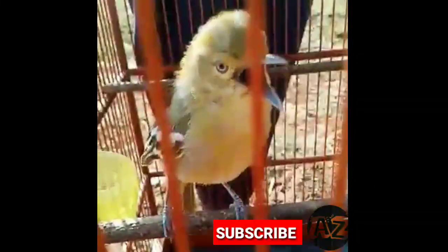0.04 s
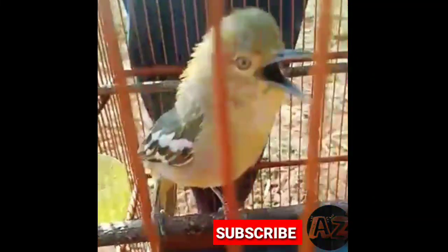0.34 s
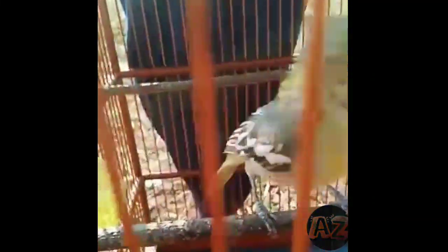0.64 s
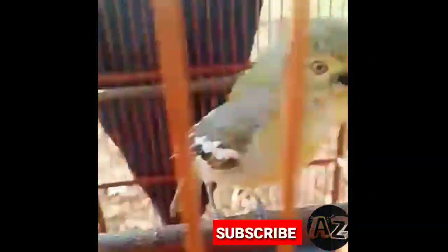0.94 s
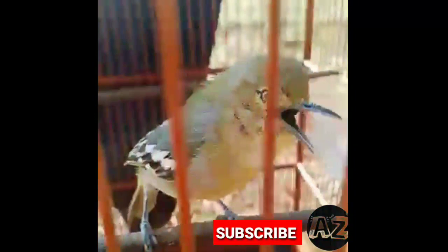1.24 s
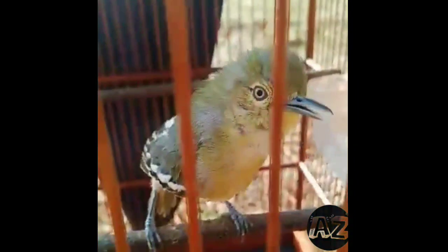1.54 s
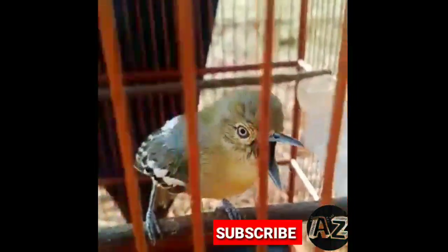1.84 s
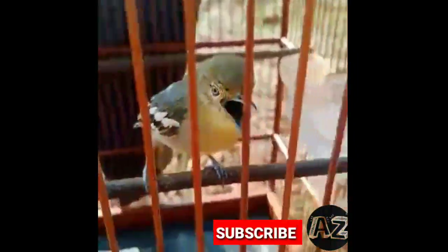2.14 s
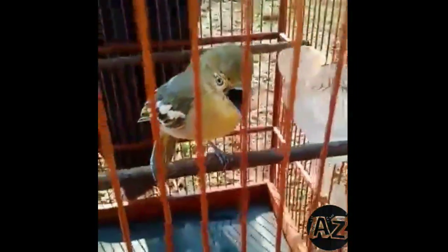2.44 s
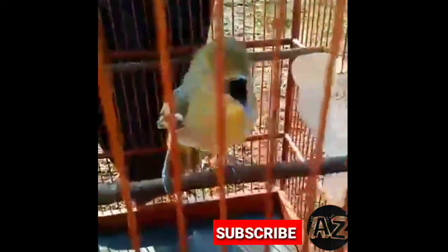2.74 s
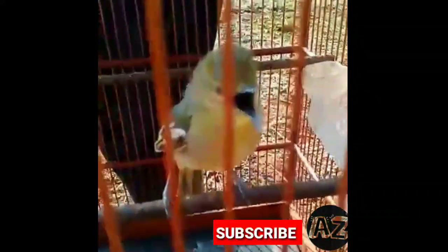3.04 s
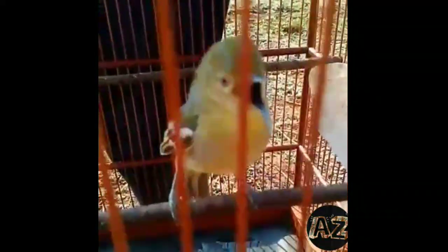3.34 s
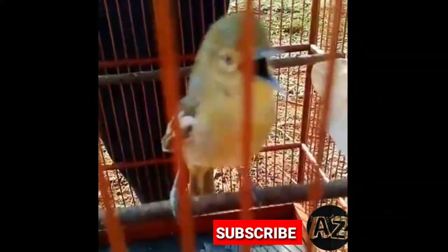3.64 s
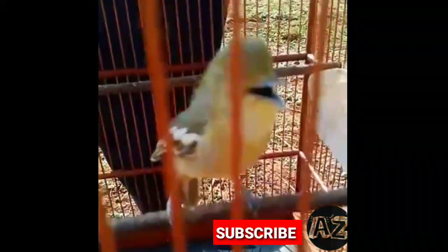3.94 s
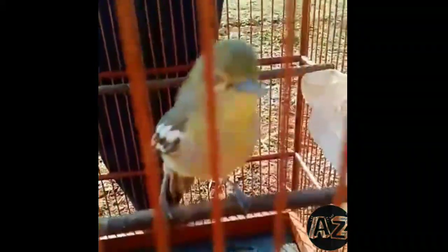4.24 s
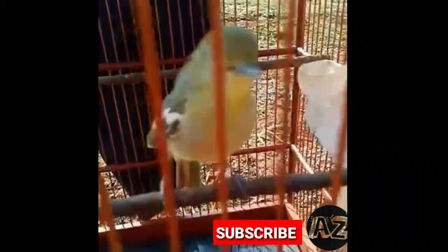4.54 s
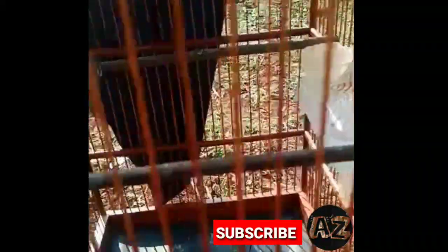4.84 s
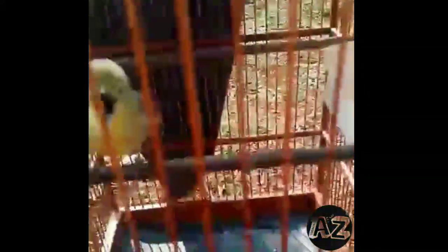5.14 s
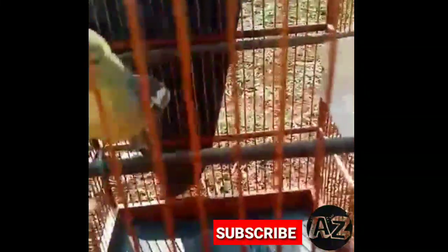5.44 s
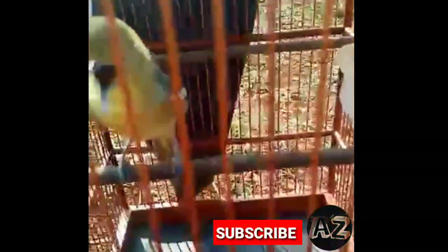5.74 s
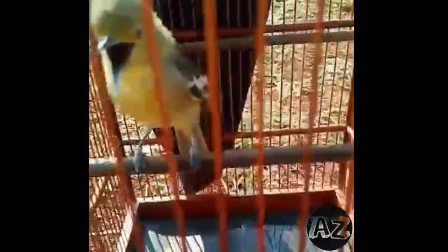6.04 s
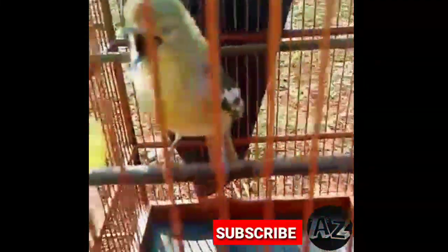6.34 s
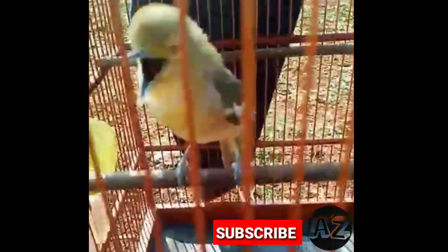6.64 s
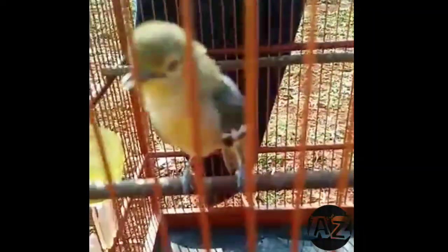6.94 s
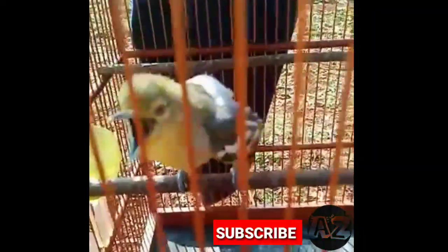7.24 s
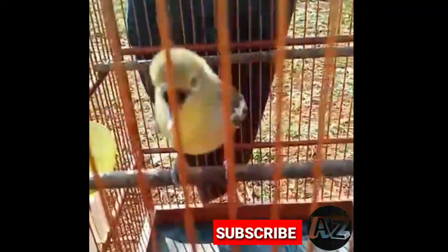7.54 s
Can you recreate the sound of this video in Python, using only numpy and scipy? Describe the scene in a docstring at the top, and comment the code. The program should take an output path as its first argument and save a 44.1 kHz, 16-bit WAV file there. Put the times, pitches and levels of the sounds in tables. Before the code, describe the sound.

A small bird scolds from its cage, a hand's width from the microphone, in three fast, rasping rattles. The first and the long third each finish with a clear downward whistle, while the middle one is short. Two quick wing flutters and a few claw clicks on the perch fill the gaps. Behind it are faint chirps from other birds, a quiet outdoor hush, low puffs of wind and a few soft hand thumps.

```python
"""In a quiet yard a caged common iora, a hand's width from a stereo phone, scolds in a long rattle: its
syrinx slaps shut and rings windpipe and throat, and the loudest syllables overload the phone. Air buffets
the ports and a hand bumps the case. As other birds chirp further off, the rattle ends in a falling whistle.
Feet click on the perch, wings flutter across the cage, and a shorter rattle follows. After a second
flutter come the longest rattle, another falling whistle and a last click."""
import sys
import numpy as np
from scipy import signal
from scipy.fft import rfft, irfft, next_fast_len
from scipy.io import wavfile
from scipy.ndimage import uniform_filter1d, minimum_filter1d, map_coordinates

SR = 44100
rng = np.random.default_rng(int(sys.argv[2]) if len(sys.argv) > 2 else 0)


def log_audio(samples):
    """Write samples as a 16-bit WAV file to the path given in sys.argv[1]."""
    # one column per channel
    frames = np.atleast_2d(samples).T
    # limit to full scale, then quantise
    limited = np.clip(frames, -1, 1)
    pcm = np.round(limited * 32767).astype(np.int16)
    wavfile.write(sys.argv[1], SR, pcm)


N = 343098
TIME = np.arange(N) / SR
# push of air through a syllable: (time from its centre [s], level [dB], glide of the resonances [ratio])
PUSH = [(-.024, -45.5, 1), (-.019, -17, 1.03), (-.013, -11.5, 1.07), (-.004, -1.5, 1.02), (.003, -1, 1),
        (.009, -3.5, 1), (.014, -17.5, .97), (.02, -31.5, .94)]


def undb(db):
    """Decibels to amplitude ratio."""
    return 10 ** (np.asarray(db) / 20)


def unit(x):
    """Normalisation to rms 1."""
    return x / np.sqrt(np.mean(x ** 2) + 1e-18)


def curve(rows, t):
    """Linear interpolation of a table's columns at times t."""
    times, *columns = np.transpose(rows)
    return [np.interp(t, times, column) for column in columns]


def colour(x, points):
    """Spectral shaping by points of (frequency [Hz], gain [dB])."""
    hz, db = np.transpose(points)
    size = next_fast_len(x.shape[-1] + 512)
    bins_hz = np.maximum(np.fft.rfftfreq(size, 1 / SR), 1)
    gain = undb(np.interp(np.log(bins_hz), np.log(hz), db))
    return irfft(rfft(x, size) * gain, size)[..., :x.shape[-1]]


def resonate(x, hz, width_hz):
    """Resonance: two like band-passes in cascade, each width_hz wide, gain 1 at the centre."""
    b, a = signal.iirpeak(hz, hz / width_hz, fs=SR)
    return signal.lfilter(b, a, signal.lfilter(b, a, x))


def wander(t, rate):
    """Random modulation: rate values a second, joined by lines; spread near 1."""
    knots = np.arange(t[0], t[-1] + 2 / rate, 1 / rate)
    return np.interp(t, knots, rng.standard_normal(len(knots)))


def pan(x, db):
    """Level difference between the ports, left minus right, at constant power."""
    gains = undb([[db / 2], [-db / 2]])
    return x * unit(gains)


def add(out, s, x):
    """Superposition of x on out from time s."""
    i = int(round(s * SR))
    a, b = max(i, 0), min(i + x.shape[-1], N)
    out[..., a:b] += x[..., a - i:b - i]


def fade(t, t60):
    """Exponential decay, 60 dB in t60 seconds."""
    return np.exp(-np.log(1000) * t / t60)


def ambience(spectrum, db, flicker_db):
    """Partial coherence: the ports share half the power of a coloured noise."""
    noise = rng.standard_normal(N) + rng.standard_normal((2, N))
    return unit(colour(noise, spectrum)) * undb(db + flicker_db * wander(TIME, 18))


def yard():
    """Background noise: a broadband hush that the phone turns down after the loud calls."""
    # (time [s], level [dB])
    levels = [(0, -53.5), (2.1, -59.5), (4.9, -59.5), (6.9, -58.5), (7.3, -68.5), (7.78, -63.5)]
    # (frequency [Hz], gain [dB])
    spectrum = [(25, -21), (60, -3), (150, -7.5), (300, -4), (600, -7), (1100, -9), (1900, -8), (3000, -14),
                (4200, -17.5), (6000, -26), (14000, -33)]
    return ambience(spectrum, curve(levels, TIME)[0], flicker_db=-0.14)


def saturate(x, amount):
    """Saturation, as in a membrane, evens out the swings of an oscillation."""
    swing = uniform_filter1d(np.abs(signal.hilbert(x)), size=48)
    return x / (swing + 0.032 * swing.mean()) ** amount


def syllable(modes, pulse_hz=470, jitter=.2, scatter_db=1.0, rasp=0.71):
    """Source and filter: in one push of air the syrinx slaps shut unevenly, ringing windpipe and throat."""
    # radiation from the beak: (frequency [Hz], gain [dB])
    beak = [(500, -21.5), (1000, -1.5), (1450, 9.5), (2000, 5), (2500, 4), (3400, 1.5), (4400, -3.5),
            (5500, -9.5), (6200, -19.5), (7200, -24), (15000, -21.5)]
    t = np.arange(PUSH[0][0], PUSH[-1][0], 1 / SR)
    push_db, glide = curve(PUSH, t)
    timing, force = rng.standard_normal((64, 2)).T
    slap_samples = (np.cumsum(np.exp(jitter * timing)) * SR / pulse_hz).astype(int)
    slaps = np.bincount(slap_samples, undb(scatter_db * force), len(t))[:len(t)]
    source = unit(slaps) + rasp * rng.standard_normal(len(t))
    voice = sum(undb(db) * resonate(source, hz, width_hz) for hz, width_hz, db in modes)
    voice = saturate(voice, amount=.4) * undb(push_db)
    voice = map_coordinates(voice, [np.cumsum(glide / glide.mean())], order=5)  # bends all frequencies
    return unit(colour(voice, beak))


def rattle(start_s, count, period_s, slow_start_s, slow_end_s, settle,
           db, sag_db, first_db, warm_up, last_db, pan_db,
           throat_hz, rise_hz, gape, first_gape, windpipe_hz, windpipe_db, first_windpipe_db,
           windpipe_width_hz=750, throat_scatter=.024, scatter_db=1, last_push_syllables=1.1):
    """Cavity tuning: as the beak closes, the throat rings lower and tighter from syllable to syllable."""
    # modes of throat and open beak: (frequency / throat resonance [ratio], width at gape 1 [Hz], gain [dB])
    throat = [(.8, 751, -13), (0.991, 841, 13.5), (1.148, 834, -20), (1.379, 1065, -24), (1.651, 1095, -22)]
    out, s = np.zeros(N), start_s
    for k, (loud, tense) in enumerate(rng.standard_normal((count, 2))):
        opening = np.exp(-k / settle)
        tired = (k / (count - 1)) ** 3
        hz = (throat_hz + rise_hz * opening) * (1 + throat_scatter * tense)
        damping = gape * (first_gape / gape) ** opening
        modes = [(ratio * hz, width_hz * damping, gain_db) for ratio, width_hz, gain_db in throat]
        pipe_db = windpipe_db + (first_windpipe_db - windpipe_db) * opening
        modes.append((windpipe_hz, windpipe_width_hz, pipe_db))
        onset_db = first_db * np.exp(-(k / warm_up) ** 2)
        ending_db = last_db * np.exp((k + 1 - count) / last_push_syllables)
        level_db = db - sag_db * k / count + onset_db + ending_db + scatter_db * loud
        add(out, s + PUSH[0][0], syllable(modes) * undb(level_db))
        s += period_s + slow_start_s * opening + slow_end_s * tired  # quickens, then drags as the bird tires
    return pan(out, pan_db)


def scolding():
    """Acoustic shadow: the three rattles reach the left port shaded by the phone's body."""
    # rhythm, effort and posture of each rattle, keyed as the arguments of rattle():
    # (*_s [s], *_hz [Hz], db and *_db [dB], count, settle and warm_up [syllables], gapes [width ratio])
    rattles = [ dict(start_s=.021, count=25, period_s=.05572, slow_start_s=.0087, slow_end_s=.0047, settle=3, db=-10.5, sag_db=3, first_db=-2.4, warm_up=2.6, last_db=-0.95, pan_db=0.5, throat_hz=3290, rise_hz=634, gape=0.72, first_gape=1.5, windpipe_hz=1390, windpipe_db=-13.5, first_windpipe_db=-8),
               dict(start_s=3.3955, count=11, period_s=.05556, slow_start_s=.0113, slow_end_s=.0083, settle=2, db=-10.5, sag_db=0.3, first_db=-18, warm_up=1.36, last_db=-2.4, pan_db=0, throat_hz=3324, rise_hz=780, gape=0.81, first_gape=3.9, windpipe_hz=1325, windpipe_db=-12.5, first_windpipe_db=4),
               dict(start_s=5.2745, count=30, period_s=.05311, slow_start_s=.0034, slow_end_s=.0038, settle=2, db=-14.5, sag_db=1.1, first_db=-7.5, warm_up=.4, last_db=2.5, pan_db=-4, throat_hz=3576, rise_hz=910, gape=1.023, first_gape=1.6, windpipe_hz=1563, windpipe_db=-13, first_windpipe_db=-17)]
    # (frequency [Hz], gain [dB])
    shade = [(900, -1), (1200, -5), (1800, 0.5), (2100, 0), (2350, -11), (2800, -0.5), (3100, -0.5),
             (3500, -1.5), (4300, -0.5), (6000, 3)]
    left, right = sum(rattle(**row) for row in rattles)
    return np.array([colour(left, shade), right])


def left_late(pair):
    """Path difference: the bird sits to the right, so its voice reaches the left port later."""
    # the bird changes perch: (time [s], lag of the left port [ms])
    perches = [(4.68, .235), (4.8, .31)]
    lag_samples = curve(perches, TIME)[0] * SR / 1000
    return np.array([map_coordinates(pair[0], [np.arange(N) - lag_samples], order=3), pair[1]])


def buffeting(draught_db=-59):
    """Turbulent pressure: gusts swell and die over a steady draught and rumble on the ports."""
    # (peak time [s], half length [s], level [dB])
    gusts = [(.12, 0.24, -37), (0.984, 0.25, -55), (2.49, 0.036, -52), (2.782, 0.05, -65),
             (3.32, 0.3, -45.5), (3.764, 0.11, -41), (4.015, 0.061, -44), (4.271, 0.046, -44),
             (4.747, .1, -46)]
    # (frequency [Hz], gain [dB])
    spectrum = [(25, -40), (55, -4), (90, 3.5), (150, -4), (250, -14), (450, -35.5), (1000, -52.5),
                (8000, -75)]
    swells = sum(undb(db) * np.exp(-((TIME - s) / half_s) ** 2) for s, half_s, db in gusts)
    return ambience(spectrum, 20 * np.log10(undb(draught_db) + swells), flicker_db=4.5)


def hand_bumps(t60=0.039, rise_s=0.001):
    """Structure-borne sound: the hand bumps the phone with a damped low thump, mostly at the right port."""
    # (time [s], frequency [Hz], relative level [dB])
    bumps = [(.05, 135.2, -21.5), (3.208, 113, -26), (3.306, 135, -24), (3.767, 123, -18.5),
             (4.246, 107, -32)]
    out, t = np.zeros((2, N)), np.arange(SR // 8) / SR
    envelope = fade(t, t60) * (1 - np.exp(-t / rise_s))
    for s, hz, db in bumps:
        add(out, s, pan(2 * undb(db) * np.sin(2 * np.pi * hz * t) * envelope, db=-26.0))
    return out


def far_birds(rough_depth=0.19):
    """Random modulation of pitch and amplitude roughens short gliding notes from other cages."""
    # (time [s], length [s], start [Hz], middle [Hz], end [Hz], level [dB], roughness [0-1])
    chirps = [(1.4, 0.13, 2720, 2640, 2120, -51, 0.2), (1.567, 0.2, 2630, 2743, 2667, -48.5, 0.24),
              (1.719, 0.079, 1433, 1542, 1530, -48, 0.16), (1.904, 0.072, 1690, 1610, 1204, -47, 0.26),
              (2.054, .14, 3440, 2800, 2380, -54, 0.34), (2.155, .037, 1300, 1050, 970, -58.5, 0.3),
              (2.251, 0.1, 1247, 1594, 1860, -46.5, 0.23), (2.378, .13, 1170, 1935, 2740, -50, 0.5),
              (2.502, .099, 1226, 2066, 2700, -51, 0.47), (2.762, 0.068, 2800, 2644, 2680, -51, 0.2),
              (4.14, 0.156, 2700, 2832, 2790, -70.5, .22), (4.227, 0.044, 1650, 1875, 1870, -62, .15),
              (4.49, .048, 1653, 1825, 1770, -61.5, .05), (4.502, .031, 1195, 1096, 1015, -54.5, 0.77),
              (4.872, .028, 1140, 1090, 1000, -48, 0.8), (4.908, .037, 1770, 1800, 1750, -57, 0.1),
              (5.055, 0.72, 3180, 2956, 3260, -46.5, 0.44), (6.033, 0.21, 2290, 1923, 1346, -34.5, 0.19),
              (7.1, .12, 627, 583, 582, -56.5, 0.31), (7.223, 0.42, 720, 707, 732, -74, 0.31),
              (7.475, 0.112, 3316, 3018, 3200, -70, .14)]
    out = np.zeros(N)
    for s, length, start_hz, middle_hz, end_hz, db, rough in chirps:
        t = np.arange(0, length, 1 / SR)
        hz = np.polyval(np.polyfit([0, length / 2, length], [start_hz, middle_hz, end_hz], 2), t)
        phase = 2 * np.pi * np.cumsum(hz * (1 + rough_depth * rough * wander(t, 1200))) / SR
        envelope = (1 + rough * wander(t, 230)) * signal.windows.tukey(len(t), .5)
        add(out, s, unit(np.sin(phase) * envelope) * undb(db))
    return pan(out, db=0)


def whistles(length_s=.212, fall_s=0.11, fall_shape=2.61, scoop=0.11, scoop_s=0.0023,
             waver=0.0035, wobble=0.0098, purity=0.67, overtone_db=1.5, flutter_db=1.77,
             break_s=.016, break_depth=0.035, flick=0.65, flick_db=-9):
    """Self-sustained oscillation of the syrinx: a tone scoops up, holds and falls, purest where loudest."""
    # (start [s], top [Hz], bottom [Hz], peak level [dB], depth of swell [ratio], left minus right [dB])
    notes = [(1.517, 2040, 1385, -7.2, .8, -4.5), (6.944, 2075, 1345, -6, 1.05, -1.5)]
    # push of air: (time from the start [s], level [dB])
    push = [(0, -18), (.008, -10), (.032, 0), (.06, -2.5), (.105, -10.5), (.16, -11), (.19, -14),
            (.212, -22)]
    # (harmonic [number], relative level [dB])
    harmonics = [(2, -29), (3, -47.5), (4, -47.5), (5, -62.5), (6, -69), (7, -71)]
    out, t = np.zeros((2, N)), np.arange(0, length_s, 1 / SR)
    push_db = uniform_filter1d(curve(push, t)[0], size=200)
    crack = np.clip((t - t[-1] + break_s) / 0.0014 + 1, 0, 1)
    for s, top_hz, bottom_hz, db, swell, pan_db in notes:
        hz = bottom_hz + (top_hz - bottom_hz) * np.exp(-(t / fall_s) ** fall_shape)
        hz *= 1 - scoop * np.exp(-t / scoop_s) + wobble * wander(t, 90)
        jitter = (waver + break_depth * crack) * wander(t, 790)
        phase = 2 * np.pi * np.cumsum(hz * (1 + jitter)) / SR
        overtones = sum(undb(gain_db + 3.2 * wander(t, 62)) * np.sin(k * phase) for k, gain_db in harmonics)
        tone = np.sin(phase) + overtones * undb(overtone_db - purity * swell * (push_db - push_db.mean()))
        # at the end the tone cracks and the other side of the syrinx flicks upward
        flick_hz = hz * (1 + flick * np.cumsum(crack) / crack.sum())
        flick_phase = 2 * np.pi * np.cumsum(flick_hz) / SR
        tone += undb(flick_db) * crack * (np.sin(flick_phase) + 0.107 * np.sin(2 * flick_phase))
        tone *= (1 + 0.05 * crack * wander(t, 1000)) * signal.windows.tukey(len(t), .04)
        level_db = db + swell * push_db + flutter_db * wander(t, 60)
        add(out, s, pan(np.sqrt(2) * tone * undb(level_db), pan_db))
    return out


def claws(tick_t60=0.014, thud_hz=170, thud_t60=0.021):
    """Impact excitation: claws tick, ring the modes of the bars and thud on the perch."""
    # (time [s], relative levels of tick [dB], ring [dB] and thud [dB], left minus right [dB])
    clicks = [(2.493, -30, -60.5, -25, 9.5), (3.049, -35, -35.5, -35, 4.5), (5.069, -41, -39, -53, -4),
              (6.581, -33, -30, -36.5, -14), (7.744, -29, -23, -66, 8.5)]
    # (frequency [Hz], t60 [s], level [dB])
    bar_modes = [(2693, 0.015, -0.5), (2180, 0.0046, -24.5), (3430, 0.004, -27.5)]
    tick_spectrum = [(200, 18.5), (900, 18.5), (3000, 12.0), (6000, 5.5), (15000, -42.0)]
    out, t = np.zeros((2, N)), np.arange(SR // 8) / SR
    ring = sum(undb(db) * np.sin(2 * np.pi * hz * t) * fade(t, t60) for hz, t60, db in bar_modes)
    thud = np.sin(2 * np.pi * thud_hz * t) * fade(t, thud_t60)
    for s, tick_db, ring_db, thud_db, pan_db in clicks:
        tick = unit(colour(rng.standard_normal(len(t)), tick_spectrum)) * fade(t, tick_t60)
        impact = undb(tick_db) * tick + undb(ring_db) * ring + undb(thud_db) * thud
        add(out, s, pan(2 * impact, pan_db))
    return out


def wings(stroke_s=.015, peak_share=.6, edge_db=-10.5, scatter_db=1.6,
          rustle_t60=0.078, air_hz=175, air_t60=0.16):
    """Friction and air displacement: each stroke rustles the feathers and throws a puff at each port."""
    # (time [s], length [s], rustle [dB] and puff [dB] of a stroke at the peak)
    flutters = [(2.68, .093, -25, -28), (4.686, 0.087, -21, -22)]
    feathers = [(100, -43), (300, -0.5), (800, -2.5), (1500, -7.5),
                (3000, 0.0), (5000, -3.0), (8000, -10.5), (15000, -25)]
    out, t = np.zeros((2, N)), np.arange(SR // 8) / SR
    attack = 1 - np.exp(-t / 0.00083)
    for s, length, rustle_db, air_db in flutters:
        for share in np.linspace(0, 1, round(length / stroke_s) + 1):
            force = undb(edge_db * (share / peak_share - 1) ** 2 + scatter_db * rng.standard_normal())
            rustle = unit(colour(rng.standard_normal((2, len(t))), feathers))
            rustle *= undb(rustle_db + 2.1 * wander(t, 470)) * fade(t, rustle_t60)
            puff = unit(resonate(rng.standard_normal((2, len(t))), air_hz, width_hz=54))
            puff *= undb(air_db) * fade(t, air_t60)
            add(out, s + share * length, force * attack * (rustle + puff))
    return out * undb([[-1.5], [1.5]])


def echoes(pair, first_s, t60, db):
    """Diffuse reflection: convolution with decaying noise, different at each port."""
    t = np.arange(SR // 2) / SR
    response = rng.standard_normal((2, len(t))) * fade(t, t60) * (t > first_s)
    response = colour(response, [(300, 6.0), (3500, 2.0), (6000, 5.5), (12000, -21.0)])
    response /= np.sqrt(np.sum(response ** 2, axis=1, keepdims=True))
    return undb(db) * signal.fftconvolve(pair, response, axes=1)[:, :N]


def scene():
    """Superposition of direct sound and reflections from cage and walls, over the air and the yard."""
    scold, far = left_late(scolding()), far_birds()
    near = scold + hand_bumps() + left_late(whistles()) + wings() + claws()
    cage = echoes(scold, first_s=0.00071, t60=0.0091, db=-11)
    walls = echoes(near, first_s=0.028, t60=0.041, db=-38)
    far_echoes = echoes(far, first_s=.006, t60=.2, db=-15)
    return near + cage + walls + far + far_echoes + buffeting() + yard()


def record(dry, ceiling=1.1, top_hz=15500):
    """Overload: a fast limiter holds the loudest peaks, what overshoots is clipped, and the top is cut."""
    allowed = np.minimum(1, ceiling / (np.abs(dry).max(axis=0) + 1e-9))
    gain = uniform_filter1d(minimum_filter1d(allowed, size=129), size=129)
    low_pass = signal.ellip(8, .1, 40, top_hz, fs=SR, output="sos")
    return signal.sosfiltfilt(low_pass, np.clip(dry * gain, -1, 1))


dry = scene()
out = record(dry)
log_audio(out)
```